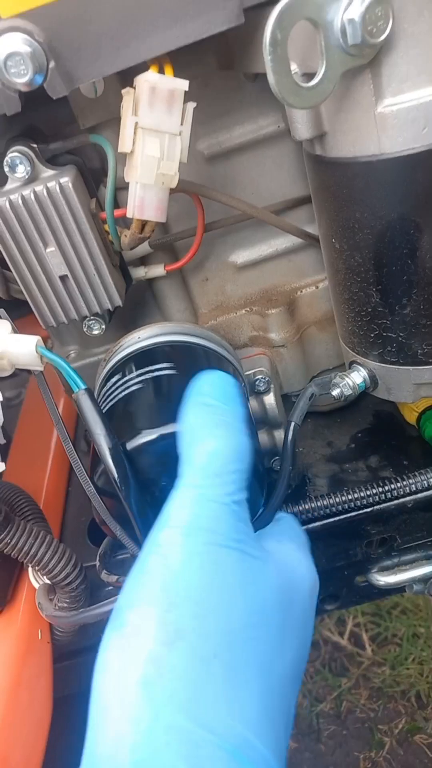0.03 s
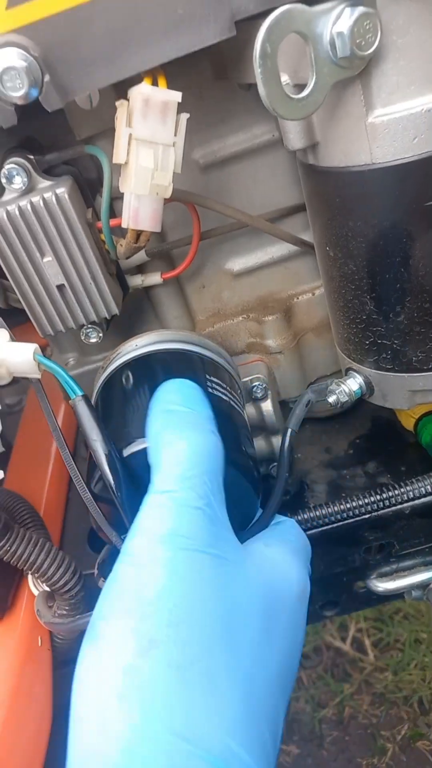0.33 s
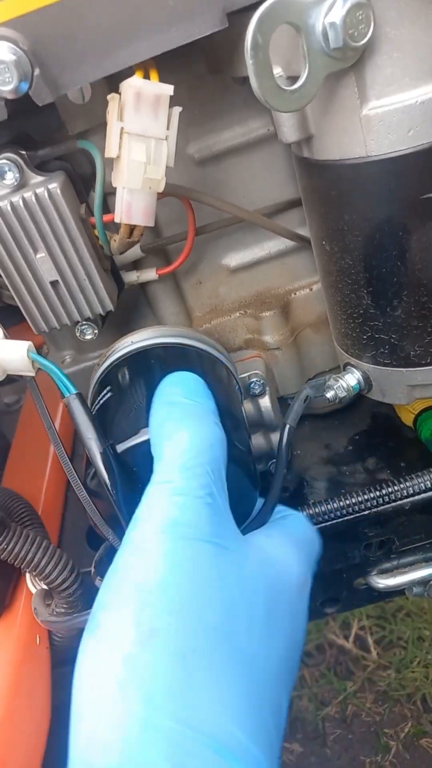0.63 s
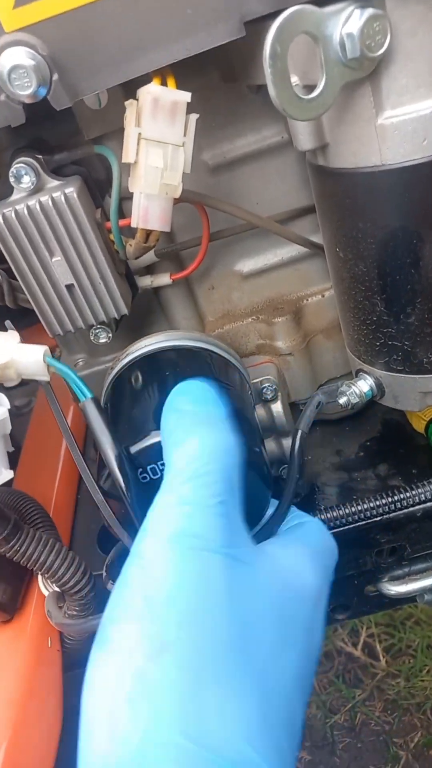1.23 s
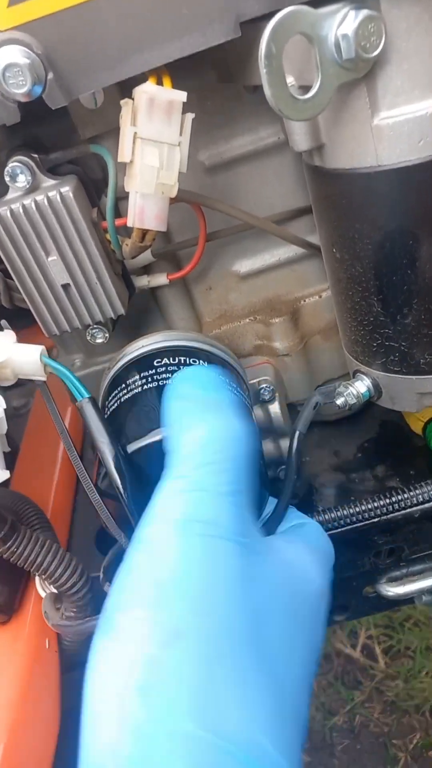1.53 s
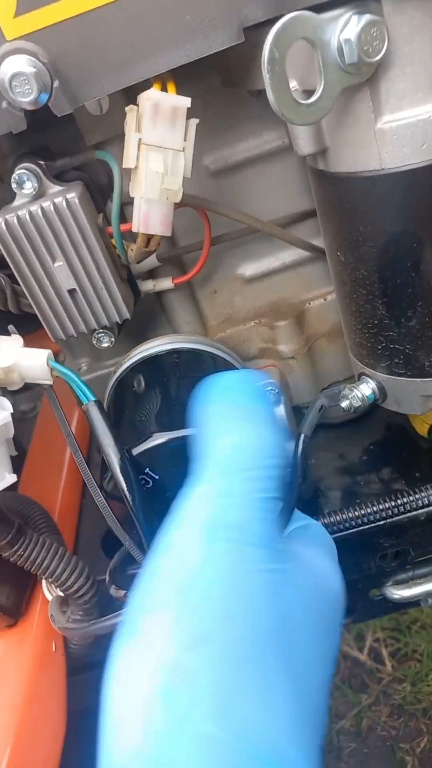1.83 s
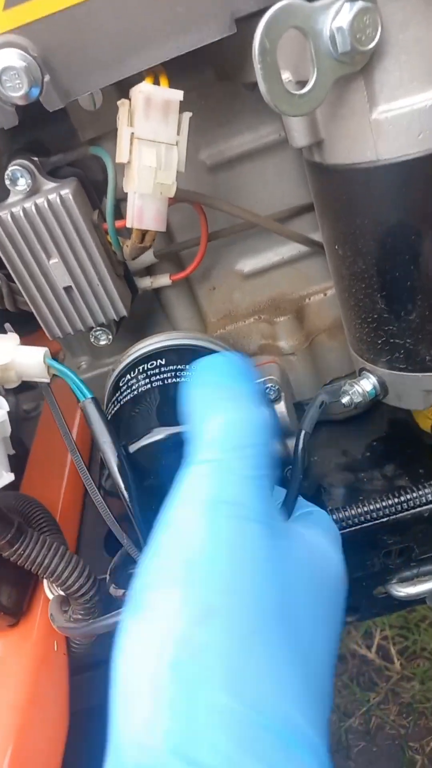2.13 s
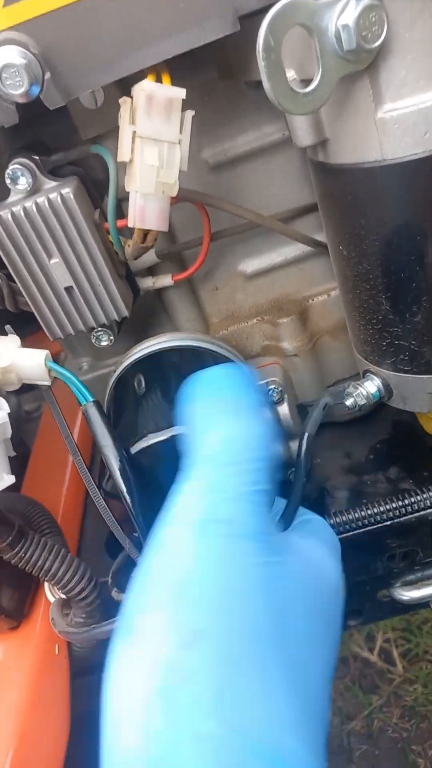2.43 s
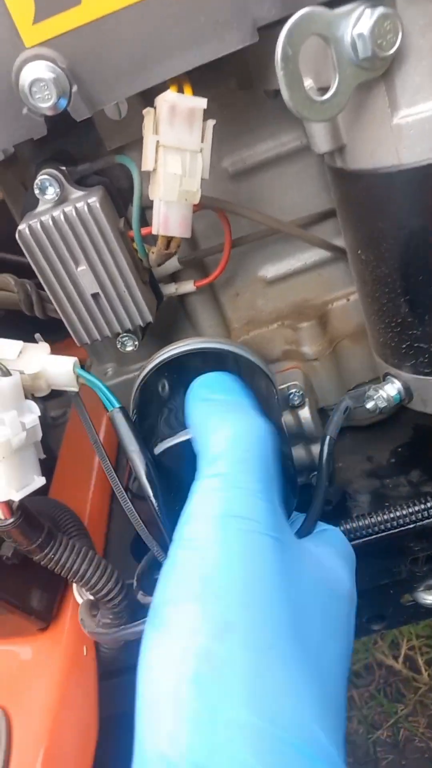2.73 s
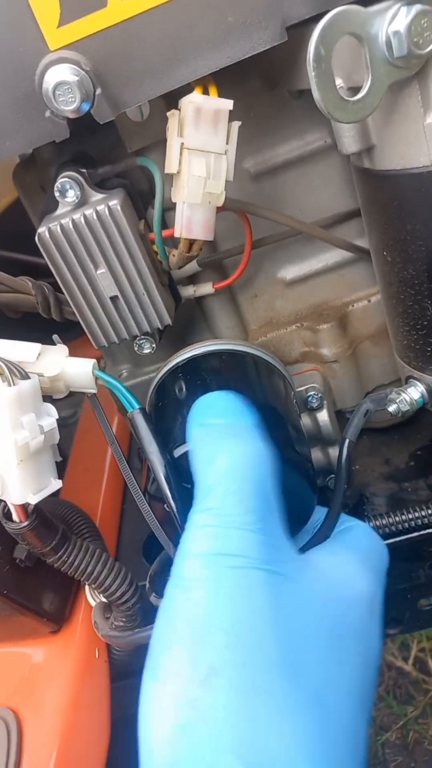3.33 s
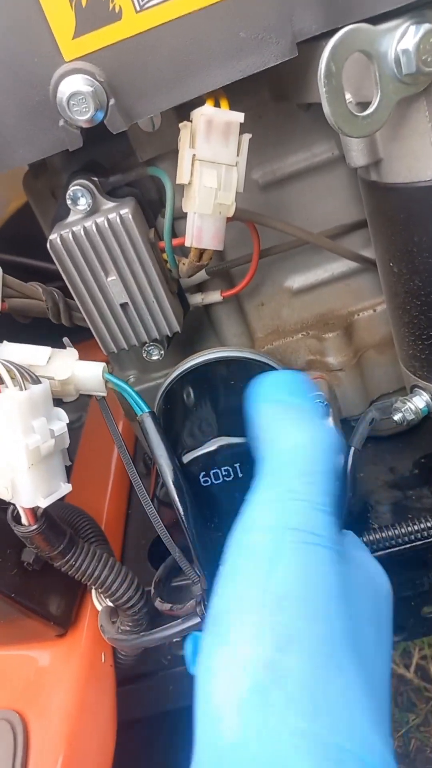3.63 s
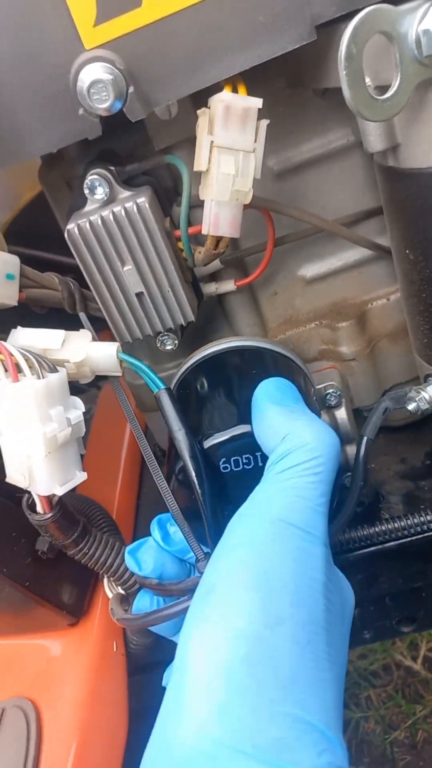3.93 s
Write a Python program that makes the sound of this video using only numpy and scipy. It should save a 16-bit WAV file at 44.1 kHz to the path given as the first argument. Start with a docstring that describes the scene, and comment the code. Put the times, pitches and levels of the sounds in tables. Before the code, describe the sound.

A gloved hand spins a loose oil filter close by, the rubber swishing about three times a second while the metal can clacks on its thread. Outdoors behind it, a distant engine drones and small birds chirp faintly.

```python
"""A gloved hand spins a loose oil filter on its thread, outdoors, about three strokes a second.
The rubber glove swishes over the filter's metal can in many tiny slips. The can clacks on
the thread and rings briefly in the engine bay. Far away an engine drones and slowly gains
speed, and small birds chirp faintly over the hush of the open air."""
import sys
import numpy as np
from scipy import signal
from scipy.fft import rfft, irfft
from scipy.io import wavfile

SR = 44100
rng = np.random.default_rng(int(sys.argv[2]) if len(sys.argv) > 2 else 0)


def master_out(mix):
    """Clip the mix to full scale and print it as 16-bit PCM to the path in sys.argv[1]."""
    frames = np.transpose(np.atleast_2d(mix))
    ceiling = np.clip(frames, -1, 1)
    pcm = np.round(ceiling * 32767).astype(np.int16)
    wavfile.write(sys.argv[1], SR, pcm)


N = 176400
T = np.arange(N) / SR

# The glove's swishing strokes, sharp scuffs and dull palm drags.
# Each row: time of the peak in seconds, level in dB, rise and fall in seconds.
STROKES = [(.025,-50.5,0.19,0.053),(.2,-62,0.083,0.24),(.34,-47.5,0.043,0.065),(.52,-63.5,0.052,0.11),(.635,-48,0.024,0.067),(.955,-46.5,0.025,0.059),(1.14,-63,0.025,0.094),(1.268,-46.5,0.03,0.054),(1.572,-48.5,0.04,0.095),(1.878,-46.5,0.037,0.056),(2.17,-49,0.027,0.11),(2.485,-47.5,0.036,0.059),(2.778,-46.5,0.03,0.045),(2.92,-59,0.057,0.16),(3.088,-47,0.038,0.043),(3.23,-56.5,0.022,0.072),(3.39,-54,0.054,.06),(3.47,-55,0.065,0.039),(3.555,-57,0.028,0.023),(3.76,-53,0.022,0.019),(3.95,-57,0.022,0.092)]
SCUFFS = [(.315,-40.5,0.0018,0.0049),(.603,-48.5,0.0058,.005),(.715,-46,0.015,0.014),(.915,-49.5,0.0057,0.0085),(1.12,-56,0.026,0.11),(1.205,-45,0.0055,0.0072),(1.262,-62,0.014,0.0081),(2.42,-47,0.005,0.011),(2.79,-40.5,0.029,0.017),(2.93,-51.5,0.024,0.021),(3.036,-41,0.0062,0.0051),(3.077,-42,0.0039,0.02),(3.13,-47,0.013,0.012),(3.38,-50,0.081,0.012),(3.52,-53.5,0.047,0.043)]
DRAGS = [(.125,-47,0.033,0.058),(.28,-50.5,0.028,0.22),(1.3,-47,0.035,0.18),(1.87,-51,0.041,0.14),(2.22,-46,0.027,.1)]
# The tone of each kind of rub. Each row: frequency in Hz, level in dB.
STROKE_SPECTRUM = [(300,-33),(700,7),(1300,7),(2400,3.5),(3600,9),(5000,4),(7200,4),(8500,-0.5),(13000,-0.5),(16000,-0.5)]
SCUFF_SPECTRUM = [(500,-19),(1500,-1.5),(2600,-3.5),(3700,3.5),(6000,-2),(7500,-6),(9000,-22),(16000,-16)]
DRAG_SPECTRUM = [(150,-29),(300,8.5),(450,4),(750,4.5),(1100,-9),(2500,-14),(6000,-27)]

# The engine speeds up. Each row: time in seconds, firings per second, level in dB.
ENGINE_SPEED = [(0,47.27,-9),(.5,49.73,-3),(1,51.64,-4.5),(1.5,53.63,0.5),(2,56.7,0.5),(2.5,58.78,-3.5),(3,62.01,-2),(3.5,64.83,1),(4,67.48,-2)]
# Its harmonics. Each row: multiple of the firing rate, level in dB at the start and at the end.
ENGINE_HARMONICS = [(1,-55,-33.5),(2,-35,-36.5),(3,-49,-41.5),(4,-51,-53.5),(5,-63,-51),(6,-50,-70)]
# A second drone beside it. Each row: time in seconds, pitch in Hz, level in dB.
DRONE = [(0,137.4,-46),(1.6,137.6,-48.5),(2.25,138.5,-34),(2.65,138.9,-42),(3.1,141.8,-31.5),(3.5,145.2,-40.5),(4,146.2,-31.5)]
# The drone's two tones. Each row: multiple of its pitch, level in dB.
DRONE_TONES = [(1,-1),(1.5,-8)]
# The tone of the engine's low rumble and throaty roar, the outdoor hush, the breeze on the
# microphones and a fine hiss. Each row: frequency in Hz, level in dB.
RUMBLE_SPECTRUM = [(20,-68),(38,-44),(55,-7.5),(85,5.5),(130,1.5),(200,-8),(330,-8.5),(390,-18),(450,-13.5),(650,-41),(1200,-31),(4000,-61)]
ROAR_SPECTRUM = [(100,-25),(175,-4.5),(240,-0.5),(320,-4.5),(390,-20),(700,-65)]
HUSH_SPECTRUM = [(100,2),(450,7),(700,4),(1000,0.5),(1500,0),(2200,-3.5),(3500,-8.5),(5000,-10),(7300,-14.5),(8200,-18.5),(16000,-42)]
BREEZE_SPECTRUM = [(20,-19),(45,-30),(90,-6.5),(300,-3),(600,-29),(2000,-52)]
HISS_SPECTRUM = [(2000,-20),(7000,-7),(10000,15),(16000,7)]
# How the rumble, roar and hush swell and sink. Each row: time in seconds, level in dB.
RUMBLE_LEVEL = [(0,-41),(.5,-38),(1.2,-38.5),(2.1,-37),(2.6,-36.5),(3.1,-39),(3.5,-38.5),(4,-38.5)]
ROAR_LEVEL = [(0,-55),(1.2,-49),(1.65,-42.5),(2,-45.5),(2.7,-47.5),(3.3,-41.5),(3.75,-38),(4,-43)]
HUSH_LEVEL = [(0,-51),(.8,-51.5),(2,-50.5),(3.3,-50.5),(4,-50)]

# The can hits its thread. Each row: start in seconds, level in dB, pitch in Hz,
# swell of the knock in milliseconds, strength of its hard edge in dB.
CLACKS = [(0.01,-29.5,1400,0.58,-20),(0.043,-39.5,1090,0.45,-8),(.104,-38,1140,1.16,-11),(0.193,-37,1180,0.65,-13),(0.368,-39.5,1580,0.47,-6),(.438,-33,1220,0.44,-14.5),(.664,-30,1430,0.51,-10.5),(.734,-37,1280,0.6,-10),(1.078,-34,1250,0.71,-12),(1.2856,-23.5,1420,0.61,-19),(1.2912,-27,1440,0.42,-11),(1.2955,-36,1480,0.4,-22),(1.356,-28.5,1190,0.4,-12),(1.365,-38,1300,.9,-6),(1.489,-35,1280,0.55,-14),(1.593,-21,1500,0.52,-19),(1.66,-28,1300,0.21,-6),(1.665,-34,1490,0.35,-9),(1.672,-29,1100,0.6,-35),(1.861,-32,1130,0.52,-16),(1.898,-34,1390,0.72,-5.5),(1.965,-26.5,1160,0.77,-11),(1.97,-26,1300,0.51,-24),(2.196,-26.5,1350,0.63,-30),(2.2,-23.5,1530,0.48,-15.5),(2.255,-38,1160,1,-20),(2.26,-24,1210,0.49,-14),(2.514,-35,1690,0.73,-16),(2.517,-25,1400,0.41,-18),(2.573,-33,1210,0.85,-11),(2.658,-30,1390,0.45,-20),(2.6603,-23.5,1380,0.4,-25),(2.687,-31,1160,0.54,-11),(2.789,-28.5,1250,0.58,-16),(2.812,-36,1280,0.99,-24),(2.816,-26.5,1300,0.89,-19),(2.871,-19,1265,0.93,-17.5),(2.8765,-41,1250,1,-23),(2.967,-37.5,1260,0.77,-18),(3.045,-35.5,1200,0.63,-13),(3.0788,-18,1270,0.43,-12.5),(3.0847,-33,1210,0.64,-21)]
# The can's ringing notes. Each row: pitch in Hz, level in dB, seconds to fade by 60 dB.
CAN_NOTES = [(528,-7,0.028),(766,-5,0.04),(844,-9,0.033),(1210,-12.5,0.12),(1580,-5,0.043),(1773,-6,0.032),(2280,-2.5,.018),(3180,-1,0.0068),(3480,2,0.01),(3760,0.5,0.002),(5820,-19,0.017),(7250,-14,0.0089)]

# Bird calls. Each row: start in seconds, level in dB, length in seconds, pitch in Hz,
# slide over the call in Hz, blur from 0 (pure) to 1 (rough).
CHIRPS = [(0.072,-62,0.12,4420,9,0.73),(0.158,-59,0.049,5470,-76,0.4),(1.074,-60,.04,5470,0,0.4),(1.491,-55.5,0.03,5650,-100,0.2),(2,-63.5,0.14,4220,100,.45),(2.019,-62,0.14,3660,-100,0.42),(2.641,-53,0.041,5620,-60,0.5),(3.04,-57,0.034,5460,-60,.25),(3.419,-57,.09,4350,-500,1),(3.464,-55.5,0.11,3530,-300,0.72),(3.719,-56,.1,1923,-450,0.7),(3.952,-56,0.048,5600,7,.2)]

# The tone of each microphone. Each row: frequency in Hz, boost or cut in dB.
LEFT_MIC = [(60,-1),(500,3),(1500,-4.5),(7300,-1.5),(8000,-5.5),(11000,1.5),(16000,0.5)]
RIGHT_MIC = [(60,-2.5),(500,1.5),(950,-0.5),(1400,1),(2200,3),(2850,-12.5),(3500,1),(4200,-3.5),(5200,-9),(7000,-32.5),(8500,-15.5),(10500,-14),(15000,-7.5)]


def from_db(db):
    """Turn decibels into a number to multiply by."""
    return 10 ** (np.asarray(db) / 20)


def rms_one(x):
    """Scale a signal so its average strength (rms) is 1."""
    return x / np.sqrt(np.mean(x ** 2) + 1e-20)


def in_time(rows):
    """Join a table's rows with straight lines, giving each column a value at every sample."""
    times, *columns = np.transpose(rows)
    return [np.interp(T, times, column) for column in columns]


def colour(x, spectrum):
    """Boost or cut each frequency along a smooth curve."""
    hz, db = np.transpose(spectrum)
    freqs = np.maximum(np.arange(N + 1) * SR / (2 * N), 1)
    gain = from_db(np.interp(np.log(freqs), np.log(hz), db))
    return irfft(rfft(x, 2 * N) * gain)[..., :N]


def drift(rate_hz):
    """A random wobble of strength 1, mostly slower than rate_hz."""
    freqs = np.arange(N // 2 + 1) * SR / N
    return rms_one(irfft(rfft(rng.standard_normal(N)) / (1 + (freqs / rate_hz) ** 2), N))


def two_ears(three, alike):
    """Mix one shared and two separate signals into a partly alike left and right."""
    return np.sqrt(alike) * three[0] + np.sqrt(1 - alike) * three[1:]


def rubbing(rubs, spectrum, slips_per_s, snaps_per_s=81, snap_db=15, slip_share=0.63):
    """Rubber on paint: tiny slips and a few tacky snaps over a hiss, swelling and fading each rub."""
    power = 0
    for peak, db, rise, fall in rubs:
        before = ((peak - T[T < peak]) / rise) ** 1.6
        after = ((T[T >= peak] - peak) / fall) ** 1.15
        power += (from_db(db) * np.exp(-np.concatenate([before, after]))) ** 2
    slips = (rng.random((3, N)) < slips_per_s / SR) * rng.choice([-1, 1], (3, N))
    slips = slips * from_db(2.5 * np.minimum(rng.exponential(1, (3, N)), 5))  # uneven sizes
    snaps = from_db(snap_db) * (rng.random(N) < snaps_per_s / SR) * rng.uniform(-1.54, 1, N)
    hiss = rng.standard_normal((3, N))
    friction = np.sqrt(slip_share) * rms_one(slips) + np.sqrt(1 - slip_share) * hiss
    texture = rms_one(colour(two_ears(friction, alike=0.44) + snaps, spectrum))
    flicker = from_db(1.46 * drift(rate_hz=62))
    return np.sqrt(power) * flicker * texture


def glove():
    """The glove swishes over the can, its rubber catches and scuffs, and the palm drags dully."""
    strokes = from_db(4) * rubbing(STROKES, STROKE_SPECTRUM, slips_per_s=1500)
    scuffs = rubbing(SCUFFS, SCUFF_SPECTRUM, slips_per_s=1100)
    drags = rubbing(DRAGS, DRAG_SPECTRUM, slips_per_s=360)
    return strokes + scuffs + drags


def wavering(hz, rate_hz, depth=0.29):
    """A tone whose strength and phase wander on the way from far off."""
    phase = 2 * np.pi * np.cumsum(hz) / SR
    tone = (1 + depth * drift(rate_hz)) * np.sin(phase)
    return rms_one(tone + depth * drift(rate_hz) * np.cos(phase))


def noise_bed(spectrum, levels, alike):
    """Unbroken noise for both ears that slowly swells and sinks."""
    noise = two_ears(rng.standard_normal((3, N)), alike)
    return from_db(in_time(levels)[0]) * rms_one(colour(noise, spectrum))


def far_engine():
    """The firings make a hum that rises with speed, beside a second drone, a rumble and a roar."""
    firing_hz, level_db = in_time(ENGINE_SPEED)
    hum = 0
    for multiple, first_db, last_db in ENGINE_HARMONICS:
        gain = from_db(level_db + first_db + (last_db - first_db) * T / T[-1])
        hum += gain * wavering(multiple * firing_hz, rate_hz=3.0)
    drone_hz, drone_db = in_time(DRONE)
    drone = sum(from_db(drone_db + db) * wavering(multiple * drone_hz, rate_hz=6.5)
                for multiple, db in DRONE_TONES)
    rumble = noise_bed(RUMBLE_SPECTRUM, RUMBLE_LEVEL, alike=0.91)
    roar = noise_bed(ROAR_SPECTRUM, ROAR_LEVEL, alike=0.91)
    return hum + drone + rumble + roar


def air():
    """The even hush of the outdoors, a light breeze on each microphone and a fine hiss."""
    hush = noise_bed(HUSH_SPECTRUM, HUSH_LEVEL, alike=0.17)
    breeze = from_db(-55) * rms_one(colour(rng.standard_normal((2, N)), BREEZE_SPECTRUM))
    hiss = rms_one(colour(rng.standard_normal((2, N)), HISS_SPECTRUM))
    return hush + breeze + from_db([[-77], [-67]]) * hiss  # more hiss on the right


def can_ring(tap):
    """A tap rings the can's notes; the grip changes their level, pitch and fade each time."""
    out = 0
    for k, (hz, db, fade_s) in enumerate(CAN_NOTES):
        gain = (-1) ** k * from_db(db + rng.normal(0, 3.5))  # every other note starts downward
        step = 2 * np.pi * hz * rng.normal(1, 0.034) / SR
        gripped_fade_s = fade_s * from_db(2.7 * rng.standard_normal())
        decay = from_db(-60 / (gripped_fade_s * SR))
        feedback = [1, -2 * decay * np.cos(step), decay * decay]  # turns a click into a fading tone
        out += gain * signal.lfilter([0, np.sin(step)], feedback, tap + 1e-18)
    return out


def bay_echoes(x, db, fade_s, delay_s=0.0036):
    """Dense echoes off the metal around the can, different for each ear and each clack."""
    t = T[:len(x)]
    echoes = rng.standard_normal((2, len(t))) * from_db(-60 * t / fade_s) * (t > delay_s)
    echoes /= np.sqrt(np.sum(echoes ** 2, axis=1, keepdims=True))
    return from_db(db) * signal.fftconvolve(x[None], echoes, axes=1)[:, :len(t)]


def clacks(crack_s=0.003, crack_band_hz=(2100, 6800)):
    """Each hit is a hollow knock, damped by the hand; its hard edge cracks and rings the can."""
    out, t = np.zeros((2, N + SR)), T[:SR // 5]
    crack_filter = signal.butter(2, crack_band_hz, "band", fs=SR, output="sos")
    for start, db, hz, swell_ms, edge_db in CLACKS:
        swell_s = swell_ms / 1000
        age = t / swell_s
        swell = (age / 2) ** 2 * np.exp(2 - age)  # peaks at twice swell_s
        knock = from_db(1) * swell * np.sin(2 * np.pi * hz * t)
        tap = from_db(edge_db + 5) * (np.arange(len(t)) == int(swell_s * SR))
        ring = can_ring(tap)
        burst = from_db(edge_db) * rng.standard_normal(len(t)) * np.exp(-t / crack_s)
        crack = signal.sosfilt(crack_filter, burst)
        direct = np.array([from_db(-1.5) * knock, knock]) + ring + crack
        early = bay_echoes(knock + from_db(1) * ring, db=-4, fade_s=0.072)
        tail = bay_echoes(knock, db=-10.5, fade_s=0.28)
        i = int(start * SR)
        out[:, i:i + len(t)] += from_db(db) * (direct + early + tail)
    return out[:, :N]


def birds(arch_hz=180, blur_hz=255):
    """Thin chirps and lower calls that arch in pitch, blurred by distance."""
    out = np.zeros(N)
    wander, flutter, smear = drift(174), drift(120), drift(130)
    for start, db, length, hz, slide_hz, blur in CHIRPS:
        on = (T >= start) & (T < start + length)
        place = 2 * (T[on] - start) / length - 1  # runs from -1 to 1 through the call
        pitch = hz + slide_hz * place / 2 - arch_hz * place ** 2 + blur * blur_hz * wander[on]
        phase = 2 * np.pi * np.cumsum(pitch) / SR
        tone = (1 + blur * flutter[on]) * np.sin(phase) + blur * smear[on] * np.cos(phase)
        out[on] += from_db(db) * (1 - place ** 2) * tone / np.sqrt(.5 + blur ** 2)
    return out


def scene(right_lag_s=0.00016):
    """The hand and filter close by, a little to the left, with the outdoors behind."""
    left, right = glove() + clacks()
    right = np.roll(right, int(right_lag_s * SR))
    return np.array([left, right]) + far_engine() + air() + birds()


def record(dry, cutoff_hz=15900):
    """Each microphone colours the sound in its own way, and the highest treble is cut."""
    pair = np.array([colour(dry[0], LEFT_MIC), colour(dry[1], RIGHT_MIC)])
    return signal.sosfilt(signal.ellip(12, .2, 80, cutoff_hz, fs=SR, output="sos"), pair)


dry = scene()
out = record(dry)
master_out(out)
```